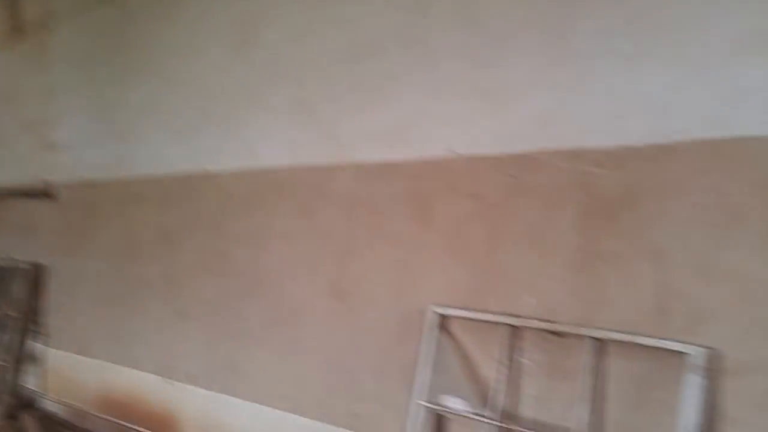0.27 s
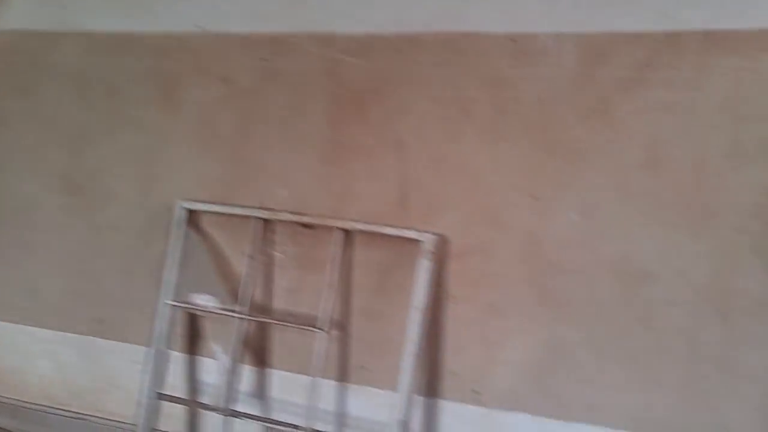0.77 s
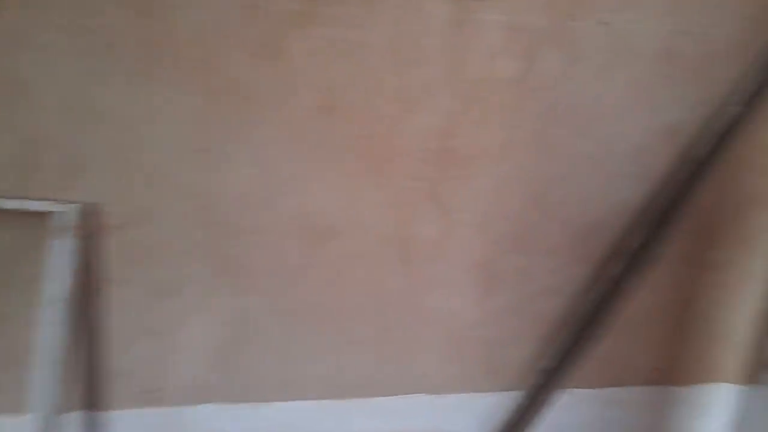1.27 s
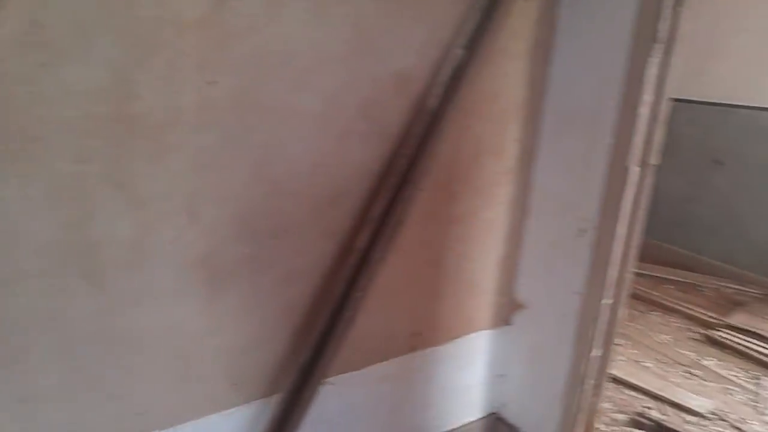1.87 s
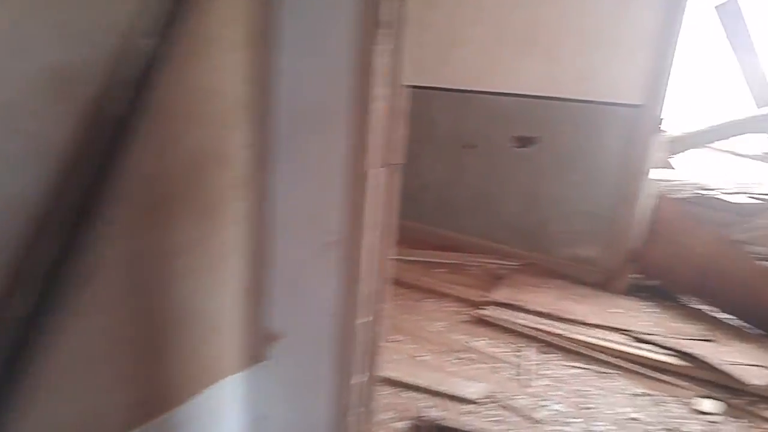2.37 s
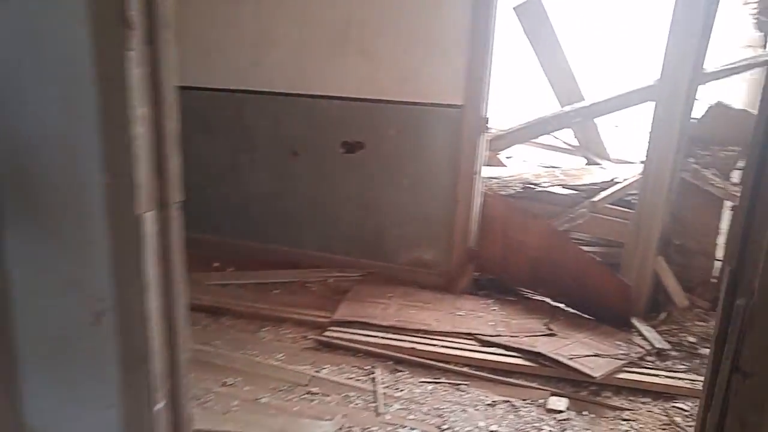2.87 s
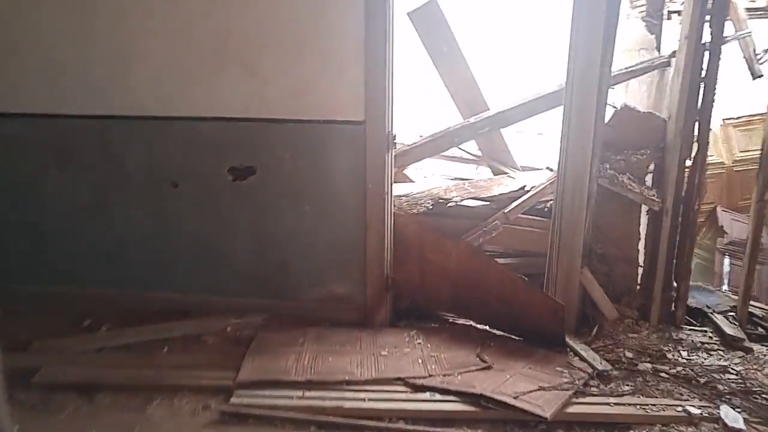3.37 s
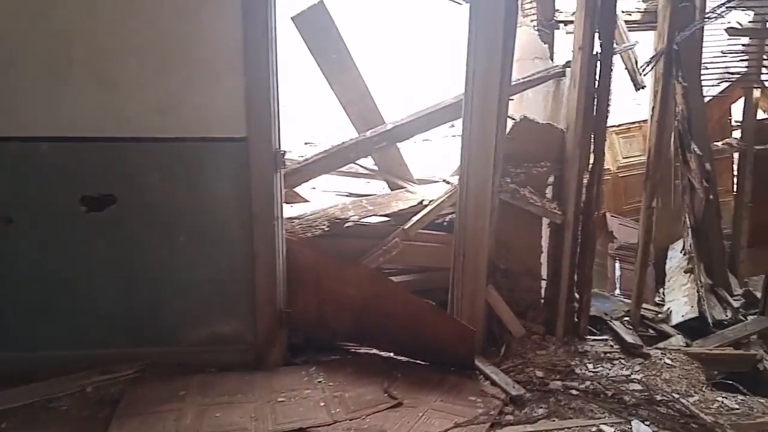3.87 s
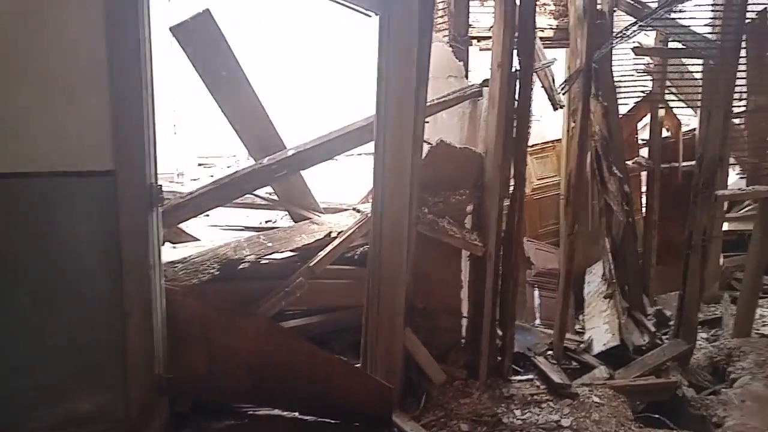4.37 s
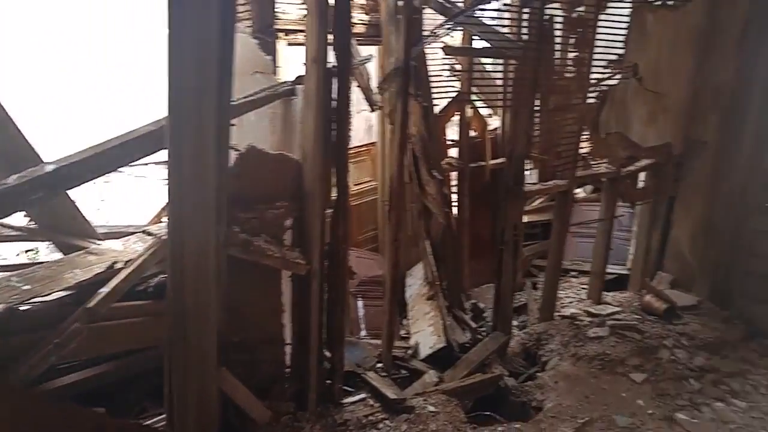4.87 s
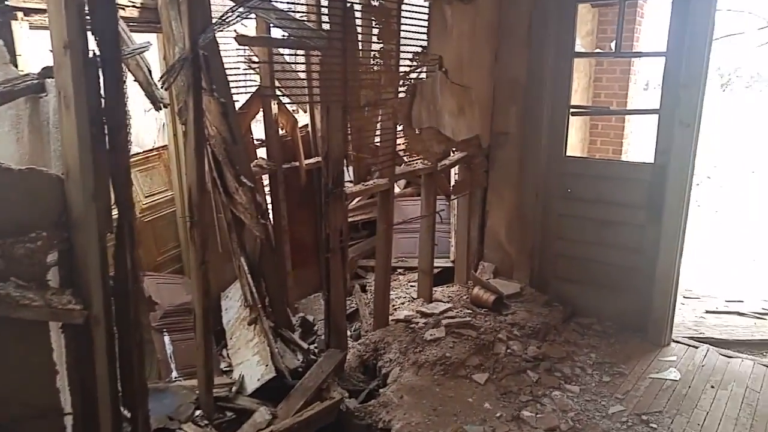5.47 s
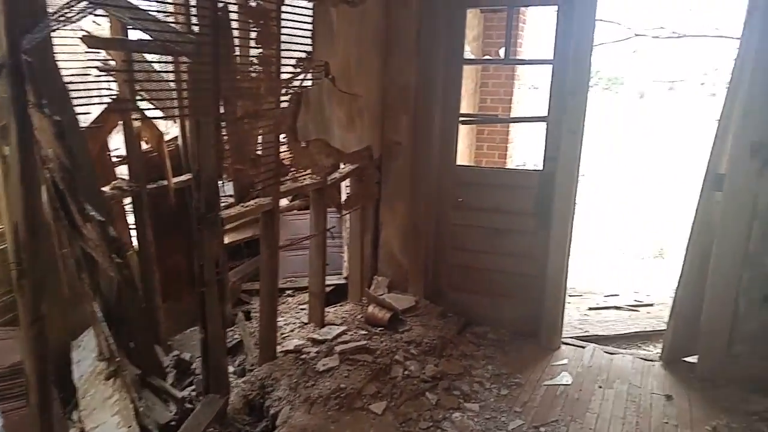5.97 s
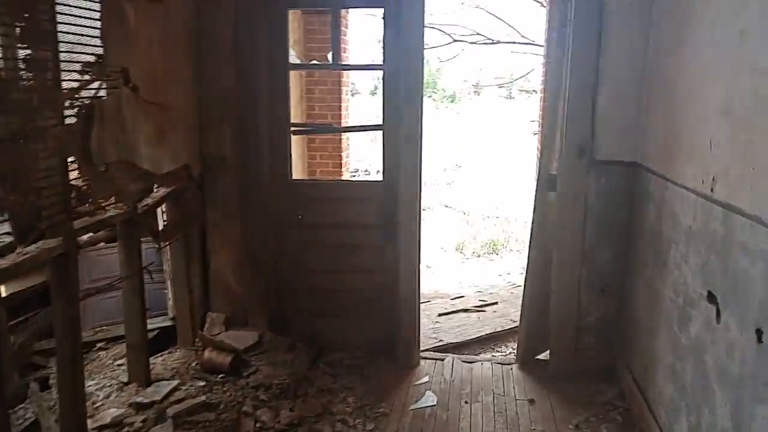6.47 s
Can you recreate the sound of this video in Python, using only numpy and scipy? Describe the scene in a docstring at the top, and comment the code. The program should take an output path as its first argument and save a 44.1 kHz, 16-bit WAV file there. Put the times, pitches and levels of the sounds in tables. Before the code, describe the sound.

A close, slightly roomy stereo pickup of slow steps in a ruined wooden building. At 0 s a shoe knocks softly on littered boards with a small grit crunch and a brittle snap; faint ticks follow until about 1 s. From 1.3 to 1.8 s comes the loudest, busiest passage: firm woody knocks, low floor thuds, ringing loose boards, grinding plaster and a rapid string of sharp, bright cracks. A small snap at 2.2 s precedes a duller, heavier step at 2.55 s. Near 3.1 s a faint contact marks the doorway, after which the echo thins. A low thud and woody clicks come at 4.1-4.3 s, a crisp bright crack and crunch at 4.75-4.9 s, a lighter knock at 5.45 s with crumbling ticks, then a soft final step around 6.5 s. Stray crumbs and a faint, low, wavering outdoor wash continue throughout.

```python
"""A shoe knocks softly on a littered floor over a faint wash of outdoor air; slow steps and brittle snaps follow.
Each step is a burst of random contacts that rings loose boards, swings the joists and grinds grit.
Chips of plaster or wood snap as runs of tiny cracks, with a tink and a woody clack.
The walker goes from a bare, echoing room into one with broken walls, open to the air outside;
two close microphone ports pick up the direct sound and echoes of shaped, decaying noise."""
import sys
import numpy as np
from scipy import signal
from scipy.io import wavfile
from scipy.ndimage import uniform_filter1d

SR = 44100
rng = np.random.default_rng(int(sys.argv[2]) if len(sys.argv) > 2 else 0)


def pcm_store(signal):
    """Save signal as 16-bit PCM."""
    levels = np.round(np.clip(np.atleast_2d(signal), -1, 1) * 32767)
    wavfile.write(sys.argv[1], SR, levels.astype(np.int16).T)


N = 296786

# All levels are relative.
# heel, sole and shifting wood meet the floor: t/s, level/dB, time to full force/s, hardness/Hz
KNOCK_EVENTS = [(0.0, -29.5, 0.0059, 970), (.038, -28.5, 0.0099, 885), (.1, -39.5, 0.014, 860),
                (.306, -42.5, 0.0084, 1970), (.344, -38, 0.0054, 1110), (.508, -44, 0.0037, 1700),
                (.84, -51, 0.0086, 940), (1.286, -30.5, 0.0055, 656), (1.293, -26, .005, 690),
                (1.305, -16, 0.0062, 1410), (1.347, -27.5, 0.009, 1360), (1.465, -32, 0.0046, 901),
                (1.517, -26, .003, 2500), (1.587, -34, 0.0082, 870), (1.62, -19, .0017, 1240),
                (1.634, -33, 0.0056, 730), (1.7, -40.5, 0.0055, 810), (1.764, -34, 0.0071, 1010),
                (1.817, -33, 0.0076, 1400), (1.904, -40.5, 0.012, 1400), (1.965, -47.5, 0.017, 860),
                (2.312, -55.5, 0.0035, 2160), (2.543, -40, .008, 423), (2.555, -25, .015, 1250),
                (2.615, -24, 0.0098, 1390), (2.665, -40.5, 0.036, 850), (3.132, -48.5, 0.0057, 1216),
                (3.18, -40.5, 0.0043, 890), (4.101, -39.5, 0.004, 1510), (4.116, -37.5, 0.0065, 1830),
                (4.218, -38, .002, 2500), (4.24, -62, 0.0088, 2387), (4.743, -34, 0.0019, 2400),
                (4.756, -36.5, 0.0051, 2900), (4.853, -42, 0.014, 1600), (5.417, -53, .007, 1990),
                (5.431, -38, 0.017, 1900), (5.459, -27.5, 0.00057, 1984), (5.536, -47, 0.018, 1992),
                (5.652, -48, 0.0054, 1100), (6.436, -41.5, 0.028, 1300), (6.487, -28.5, 0.0015, 1285),
                (6.546, -51, 0.028, 912), (6.615, -46.5, .014, 1180)]
# power spectrum of a knock on the littered floor: f/Hz, level/dB
FLOOR_SPECTRUM = [(30, -31.5), (70, -19.5), (140, -13), (185, -9), (215, -12), (260, -5.5), (480, -5.5),
                  (700, 4.5), (1000, -2), (1300, -5), (2000, -7), (3300, -13.5), (8000, -6.5),
                  (16000, -32.5)]
# modes of a loose board: f/Hz, level/dB, t60/s
BOARD_MODES = [(262.6, -13, 0.12), (308.7, -7, 0.48), (358.7, -1.5, 0.49), (405.7, -3.5, 0.57),
               (433, -1.5, 0.41), (635, -10, 0.59), (643, -6.5, 0.3), (762, -12, 0.52), (808, -9, 0.09)]
# looseness of the boards along the way: t/s, ring relative to a knock/dB
BOARD_LOOSENESS = [(0, -16.5), (.8, -15.5), (1.3, -2), (1.9, -0.5), (2.6, -6.5), (3.2, -15.5), (4.1, -1),
                   (4.8, -11), (6.0, -19), (6.6, -9)]
USUAL_HARDNESS_HZ, RING_DB_PER_OCTAVE = 1034, -11.5  # softer landings rock the boards more
# grit ground under the sole: t/s, level/dB, time to full pressure/s
CRUNCH_EVENTS = [(0.0, -46, 0.032), (.05, -36.5, 0.016), (0.31, -49, 0.0063), (.51, -59.5, 0.02),
                 (1.292, -37, 0.051), (1.341, -29.5, 0.0098), (1.464, -24.5, 0.0038), (1.518, -34.5, 0.013),
                 (1.631, -33.5, 0.0079), (1.72, -39, 0.014), (1.814, -48, 0.018), (1.932, -59.5, 0.028),
                 (2.199, -46, 0.0099), (2.478, -53.5, 0.11), (2.558, -40, 0.014), (2.617, -39, 0.02),
                 (3.133, -57.5, 0.027), (4.103, -49.5, 0.02), (4.222, -46.5, 0.012), (4.756, -39, 0.015),
                 (4.865, -33.5, 0.0063), (5.427, -53.5, 0.039), (5.527, -46, 0.032), (5.655, -53, 0.0096),
                 (6.117, -69.5, .012), (6.444, -55.5, 0.073), (6.547, -50, 0.01), (6.615, -59.5, .015)]
# power spectrum of crushed grit: f/Hz, level/dB
GRIT_SPECTRUM = [(100, -31.5), (700, -9), (1800, 0.5), (3500, -5.5), (6000, -0.5), (9000, 3), (12000, -4.5),
                 (16000, -2)]
# power spectrum of the outdoor air: f/Hz, level/dB
AIR_SPECTRUM = [(20, -6.5), (50, 13), (90, 7.5), (150, -0.5), (290, -5), (410, 3), (510, -7.5), (640, 3.5),
                (1200, -4.5), (2000, -18.5), (3500, -25.5), (8000, -23), (16000, -20.5)]
# swell and fade of the outdoor air: t/s, level/dB
AIR_LEVELS = [(0, -53), (1.15, -63), (2.4, -55.5), (3.049, -66.5), (3.5, -64.5), (3.8, -58), (4.45, -68),
              (4.9, -62.5), (5.4, -72), (6.2, -71.5), (6.73, -59.5)]
# likeness of diffuse sound at the two ports: f/Hz, left-right correlation
PORT_LIKENESS = [(100, 0.93), (380, 0.89), (700, 0.47), (1300, 0.025), (3000, 0.14), (6000, 0),
                 (16000, 0.25)]
# bearing of the feet: t/s, delay of the left port behind the right/ms
FEET_BEARING = [(0, .19), (1.4, .1), (2.6, 0.31), (4.2, 0.42), (4.7, .02), (6.5, 0.11)]
# room decay before each room's t60 scale: f/Hz, t60/s
ROOM_DECAY = [(80, 0.97), (400, 0.58), (900, 0.56), (2000, 0.53), (5000, .5), (9000, 0.4), (15000, 0.39)]
DOORWAY_S = 3.0
# weight comes onto a foot: t/s, level/dB, abruptness as tilt of the floor's modes/(dB per octave)
WEIGHT_EVENTS = [(0.034, -49, 4), (1.305, -41, -7.5), (1.621, -47, -4.5), (2.239, -54, 2.5),
                 (2.553, -39, 2), (2.791, -46.5, -25), (3.159, -60.5, -6), (3.771, -58, -12),
                 (4.111, -37, -5), (4.743, -51, 1), (4.86, -66, 4), (5.428, -50.5, -1), (5.532, -56.5, -6),
                 (6.447, -49.5, -7)]
# modes of the joists and the planks on them: mean f/Hz, level/dB, lag behind the foot/s, time to full swing/s
FLOOR_MODES = [(55, 0.5, .018, .023), (105.6, 0.5, 0.00098, 0.016), (183, -6, .004, 0.017)]
# a chip or splinter snaps: t/s, level/dB, chip pitch/Hz, woody body relative to chip/dB, crumbling decay/s
SNAP_EVENTS = [(.051, -11, 8500, -27.5, 0.0055), (.309, -39, 5970, 6.5, 0.0022),
               (.510, -36, 8270, -7, 0.0018), (0.845, -46.5, 5350, -13.5, 0.0023),
               (.987, -39, 10030, -25, 0.0019), (1.309, -16, 7600, 3, 0.0011),
               (1.349, -7, 9500, -7.5, 0.0021), (1.355, -10, 6950, -16.5, 0.0028),
               (1.471, -5.5, 5700, -19, 0.002), (1.518, -4, 6950, -6.5, 0.002),
               (1.746, -19, 7600, -28, 0.0024), (2.096, -26, 6300, -1.5, 0.0023),
               (2.142, -42.5, 2100, 11, .003), (2.215, -17, 8100, -8, 0.00058),
               (2.318, -37.5, 6600, 4, .003), (2.466, -34, 9500, -6.5, 0.0022),
               (2.879, -34.5, 8900, -43, 0.0021), (3.793, -40.5, 8000, -18.5, 0.00208),
               (4.131, -31, 9700, 5, 0.0024), (4.185, -35, 6700, 2, 0.0023),
               (4.221, -23.5, 6450, 3, 0.0011), (4.233, -34.5, 9400, 4.5, 0.0028),
               (4.256, -36, 8100, 4.5, 0.0014), (4.3403, -25, 5140, -7, 0.0015),
               (4.625, -36.5, 6860, -8.5, 0.0017), (4.714, -39.5, 9800, -7, 0.0013),
               (4.758, -2.5, 8400, -2.5, 0.00035), (4.775, -25, 9350, -9, 0.0051),
               (4.854, -27, 8000, -14, 0.0064), (5.53, -31, 8000, -10, .012),
               (5.573, -28.5, 7350, -12.5, 0.027), (5.676, -37.5, 5950, 2, .0015),
               (6.239, -38, 11000, -12, 0.00091), (6.301, -46, 11500, -12, 0.0048),
               (6.461, -33, 12600, -19, 0.00106), (6.492, -31, 11870, -20, .0015),
               (6.529, -37, 10500, -21, .0015), (6.548, -26, 5000, -12, 0.0027),
               (6.551, -33.5, 10800, -25, 0.01)]
# a snap has a faint lead-in, a main crack and a fainter repeat: t from the main crack/s, level/dB
SNAP_STAGES = [(-.003, -16), (0, 0), (.006, -12.5)]
CRUMBLE_SPREAD_DB, SHARP_CRACK_DB = 2, -3  # unevenness of the small cracks; first sharp crack against them
TINK_DB, TINK_DECAY_S = -12.5, .005  # ring of the chip
CHIP_BELOW, CHIP_ABOVE = 1.18, 1.286  # band edges as ratios to the chip pitch
CLACK_LO_HZ, CLACK_HI_HZ = 1020, 2580  # wood under a chip
# loud snaps happen right under the shoe and send relatively less to the room
USUAL_SNAP_DB, USUAL_SEND_DB, SEND_DB_PER_DB = -26, -6, -0.04
# colour of the microphone ports: f/Hz, left level/dB, right level/dB
PORT_COLOUR = [(457, 1.5, 2), (520, -14, -4), (588, 1, 1), (1170, 1, 2), (3450, 5, 4), (5500, 1.5, 3.5),
               (8120, 6, -2), (8350, 3, 12.5), (9090, 4, 6), (9970, -1.5, 3), (12400, -1.5, 1),
               (16000, -5, -10.5)]
EDGE_HZ = 16200


def amp(db):
    """Decibels to gain."""
    return 10 ** (np.asarray(db) / 20)


def evened(x):
    """Scales to an rms of 1."""
    return x / np.sqrt(np.mean(x ** 2) + 1e-20)


def read(points, hz):
    """Interpolates (f/Hz, value) rows on a log-frequency axis."""
    f, value = np.transpose(points)
    return np.interp(np.log(hz + 1), np.log(f + 1), value)


def along(points, s):
    """Interpolates (t/s, value) rows linearly in time."""
    return np.interp(s, *np.transpose(points))


def add(mix, s, sound):
    """Mixes a sound in at the given time."""
    part = mix[..., max(round(s * SR), 0):][..., :sound.shape[-1]]
    part += sound[..., :part.shape[-1]]


def colour(x, spectrum, size=4096):
    """Minimum-phase, causal filter with the given spectrum."""
    log_gain = np.log(amp(read(spectrum, abs(np.fft.fftfreq(size, 1 / SR)))))
    taps = np.fft.ifft(np.exp(np.conj(signal.hilbert(log_gain)))).real[:size // 2]
    return signal.fftconvolve(x, taps)[:len(x)]


def band(x, lo_hz, hi_hz):
    """Gentle band-pass."""
    edges_hz = [lo_hz, min(hi_hz, SR / 2 - 500)]
    return signal.sosfilt(signal.butter(1, edges_hz, "band", fs=SR, output="sos"), x)


def press(swell_s):
    """Pressure of a foot: rises steeply to 1 in swell_s, then lets go."""
    u = np.arange(int(6 * swell_s * SR)) / (swell_s * SR)
    return np.sqrt(u) * np.exp((1 - u ** 2) / 4)


def sized(x, pressure):
    """Gives a sound the energy of the pressure that drives it."""
    return x * np.sqrt(np.sum(pressure ** 2) / (np.sum(x ** 2) + 1e-20))


def grains(pressure, per_s, spread_db, size=2000):
    """Random small contacts of uneven size under a pressure, padded to ring out."""
    n = len(pressure)
    sizes = amp(spread_db * np.minimum(rng.exponential(1, n), 4)) * rng.choice([-1, 1], n)
    struck = rng.random(n) < per_s / SR
    return np.pad(pressure * sizes * struck, (0, size))


def port_pair(n, field_db, size=512):
    """Diffuse noise at two close ports, alike in the bass; field_db(t, hz) shapes it."""
    hz, t, (a, b) = signal.stft(rng.standard_normal((2, n)), SR, nperseg=size)
    same = np.clip(read(PORT_LIKENESS, hz), -1, 1)[:, None]
    pair = np.array([a, same * a + np.sqrt(1 - same ** 2) * b])
    pair = pair * amp(field_db(t, hz[:, None]))
    return signal.istft(pair, SR, nperseg=size)[1][:, :n]


def board_ring(swell_s, t):
    """Decaying modes of a loose board; each mode is detuned a little at random per knock."""
    ring = np.zeros(len(t))
    for hz, level_db, t60_s in BOARD_MODES:
        cycles = hz * rng.normal(1, .015) * t + rng.random()
        ring += amp(level_db - 60 * t / t60_s) * np.sin(2 * np.pi * cycles)
    return ring * (1 - np.exp(-t / swell_s))


def knocks():
    """A shoe lands in many contacts, duller when soft; returns these and the ring of loose boards."""
    contacts, boards = np.zeros(N), np.zeros(N)
    t = np.arange(SR * 2 // 3) / SR
    for s, db, swell_s, hard_hz in KNOCK_EVENTS:
        force = press(swell_s)
        touches = grains(force, per_s=2400, spread_db=5.0)
        softness = signal.butter(2, min(hard_hz * 0.87, SR / 3), fs=SR, output="sos")
        blow = sized(signal.sosfilt(softness, colour(touches, FLOOR_SPECTRUM)), force)
        # harder landings knock together smaller, higher-pitched scraps of wood
        scraps = 0
        for hz in hard_hz * np.array([.7, 1.05, 1.5]):
            scraps = scraps + band(grains(force, per_s=870, spread_db=2.0), hz / 1.07, hz * 1.07)
        add(contacts, s, amp(db) * (blow + amp(-17.5) * sized(scraps, force)))
        hardness_octaves = np.log2(hard_hz / USUAL_HARDNESS_HZ)
        board_db = along(BOARD_LOOSENESS, s) + RING_DB_PER_OCTAVE * hardness_octaves
        add(boards, s, amp(db + board_db) * sized(board_ring(swell_s, t), force))
    return contacts, boards


def crunches():
    """Crumbs of plaster burst under the sole: separate ticks over a fine grinding."""
    out = np.zeros(N)
    for s, db, swell_s in CRUNCH_EVENTS:
        force = press(swell_s)
        ticks = sized(grains(force, per_s=450, spread_db=3.5), force)
        grinding = sized(grains(force, per_s=5000, spread_db=2.0), force)
        crumbs = ticks + 0.25 * grinding
        add(out, s, amp(db) * sized(colour(crumbs, GRIT_SPECTRUM), force))
    return out


def trickle():
    """Stray crumbs settle throughout as sparse, grit-coloured contacts."""
    crumbs = grains(np.ones(N), per_s=150, spread_db=3.5)[:N]
    return amp(-77) * evened(colour(crumbs, GRIT_SPECTRUM))


def air():
    """Soft wash of the outdoors through the openings: coloured noise in drifting patches."""
    def field_db(t, hz):
        patches = rng.standard_normal((len(hz), len(t)))
        patches = uniform_filter1d(patches, size=12, axis=0)
        patches = uniform_filter1d(patches, size=4, axis=1)
        return read(AIR_SPECTRUM, hz) + 1.0 * evened(patches)  # 1 dB rms
    wash = evened(port_pair(N, field_db, size=2048))
    return wash * amp(along(AIR_LEVELS, np.arange(N) / SR))


def from_the_feet(x):
    """Direct sound reaches the right port a little earlier and louder than the left."""
    n = np.arange(N)
    delay = np.round(along(FEET_BEARING, n / SR) * SR / 1000).astype(int)
    return np.array([amp(-3.5) * x[np.clip(n - delay, 0, N - 1)], x])


def echoes(t60_scale, tail_db, early_db, early_t60_s):
    """Response of one spot: a flurry off the floor and near walls, then the room's tail."""
    t = np.arange(SR * 3 // 4) / SR
    flurry = port_pair(len(t), lambda t, hz: 0 * hz)
    flurry = flurry * amp(-60 * t / early_t60_s) * (t > .003)
    tail = port_pair(len(t), lambda t, hz: -60 * t / (t60_scale * read(ROOM_DECAY, hz)))
    tail = tail * (1 - np.exp(-t / 0.015))
    early = amp(early_db) * flurry / np.linalg.norm(flurry[0])
    return early + amp(tail_db) * tail / np.linalg.norm(tail[0])


def room(x, size=12288):
    """Echo pattern redrawn per block as the walker moves; the tail weakens beyond the doorway."""
    out = np.zeros((2, N))
    for start in range(0, N, size):
        if start / SR < DOORWAY_S:
            response = echoes(t60_scale=0.75, tail_db=-1.0, early_db=0, early_t60_s=0.047)
        else:
            response = echoes(t60_scale=0.71, tail_db=-7.5, early_db=-1.5, early_t60_s=.11)
        wet = signal.fftconvolve(x[None, start:start + size], response, axes=1)
        add(out, start / SR, wet)
    return out


def thuds():
    """Joists and planks swing for a few uneven cycles; an abrupt step favours the planks."""
    out = np.zeros(N)
    for s, db, tilt_db in WEIGHT_EVENTS:
        for hz, mode_db, lag_s, swell_s in FLOOR_MODES:
            swing = press(swell_s)
            wander = evened(uniform_filter1d(rng.standard_normal(len(swing)), size=150))
            cycles = np.cumsum(hz * (1 + .15 * wander)) / SR
            level_db = db + mode_db + tilt_db * np.log2(hz / FLOOR_MODES[0][0])
            add(out, s + lag_s, amp(level_db) * swing * np.sin(2 * np.pi * cycles))
    return out


def snaps():
    """Each stage is a sharp crack and a run of smaller ones; the chip tinks, the wood under it clacks.

    Returns the direct sound and the part sent to the room."""
    direct, sent = np.zeros(N), np.zeros(N)
    t = np.arange(SR // 15) / SR
    for s, db, chip_hz, body_db, crumble_s in SNAP_EVENTS:
        strain = np.exp(-t / crumble_s)
        send_db = USUAL_SEND_DB + SEND_DB_PER_DB * (db - USUAL_SNAP_DB)
        for after_s, stage_db in SNAP_STAGES:
            cracks = sized(grains(strain, per_s=6700, spread_db=CRUMBLE_SPREAD_DB), strain)
            cracks[0] += amp(SHARP_CRACK_DB) * np.linalg.norm(strain[:60])
            tink = np.sin(2 * np.pi * chip_hz * t) * np.exp(-t / TINK_DECAY_S)
            tink = np.pad(tink, (0, len(cracks) - len(t)))
            crackle = sized(band(cracks, chip_hz / CHIP_BELOW, chip_hz * CHIP_ABOVE), strain)
            chip = crackle + amp(TINK_DB) * sized(tink, strain)
            clack = band(band(cracks, CLACK_LO_HZ, CLACK_HI_HZ), CLACK_LO_HZ, CLACK_HI_HZ)
            snap = amp(db + stage_db) * (chip + amp(body_db) * sized(clack, strain))
            add(direct, s + after_s, snap)
            add(sent, s + after_s, amp(send_db) * snap)
    return np.array([direct, sent])


def scene():
    """Steps and snaps arrive directly and by way of the room, over the floor's own ring and the air."""
    contacts, boards = knocks()
    steps = contacts + crunches() + trickle()
    snap, snap_sent = amp(-7.0) * snaps()
    airborne = from_the_feet(steps + snap) + room(steps + snap_sent)
    underfoot = thuds() + boards  # the whole floor radiates, alike to both ports
    return amp(-2.5) * airborne + underfoot + air()


def record(dry):
    """Each microphone port has its own resonances; then a rumble filter and a treble limit."""
    ports = np.array(PORT_COLOUR)
    heard = np.array([colour(dry[k], ports[:, [0, k + 1]]) for k in range(2)])
    heard = signal.sosfilt(signal.butter(3, 38, "high", fs=SR, output="sos"), heard)
    treble_limit = signal.firwin(301, EDGE_HZ, window=("kaiser", 8), fs=SR)
    return signal.oaconvolve(heard, treble_limit[None], "same")


dry = scene()
out = record(dry)
pcm_store(out)
```